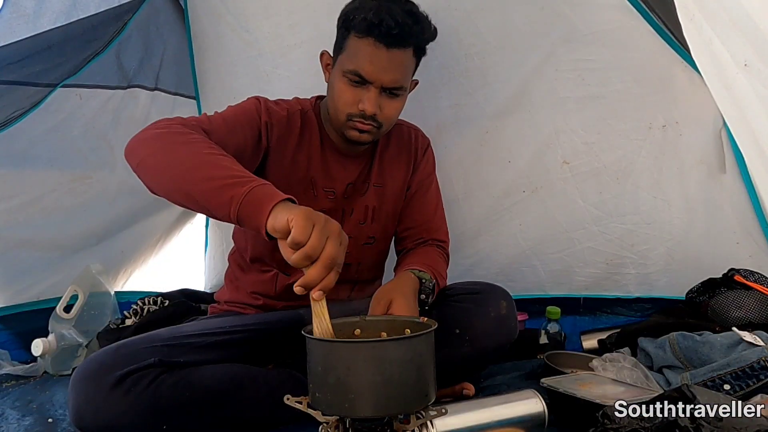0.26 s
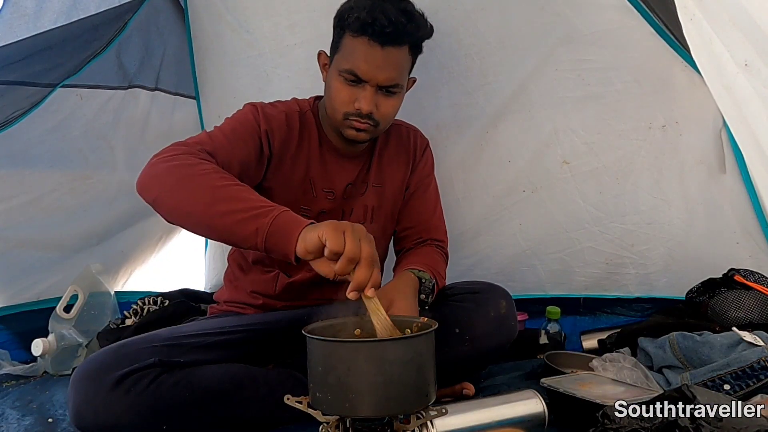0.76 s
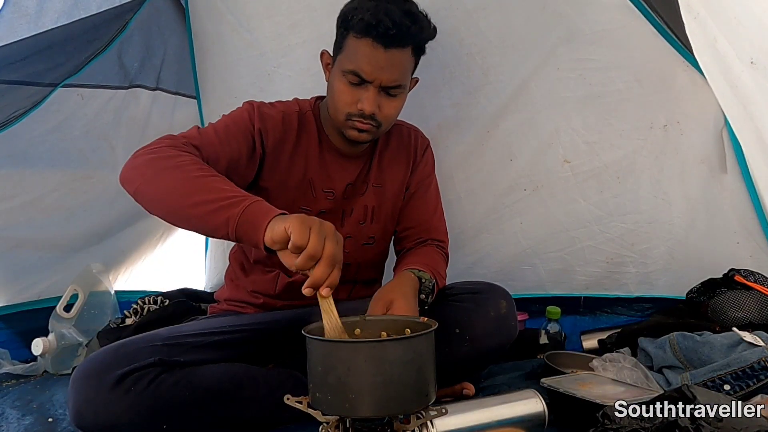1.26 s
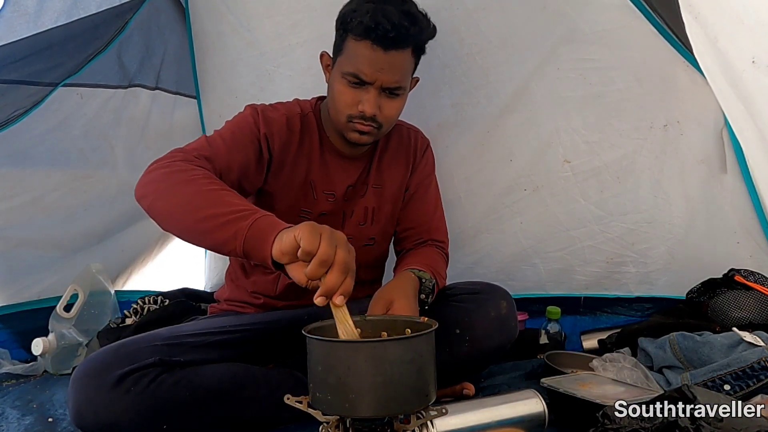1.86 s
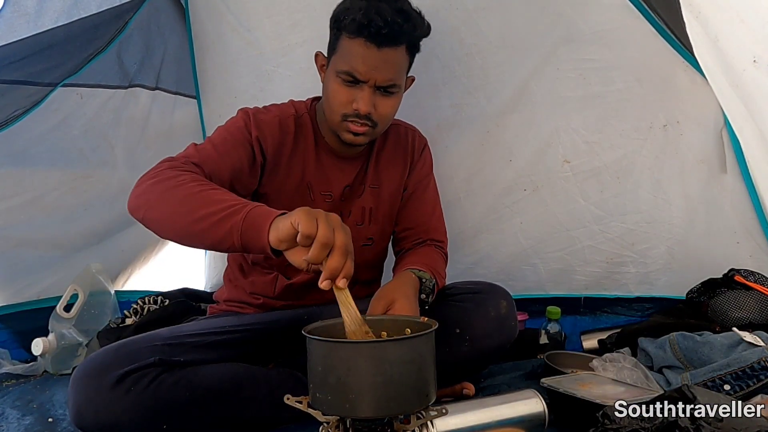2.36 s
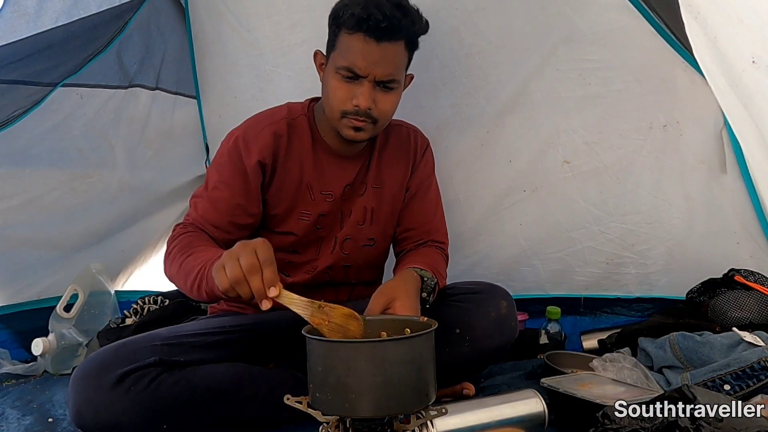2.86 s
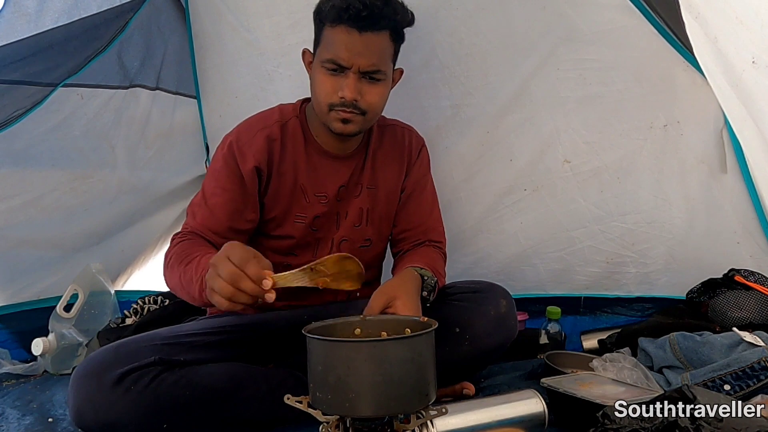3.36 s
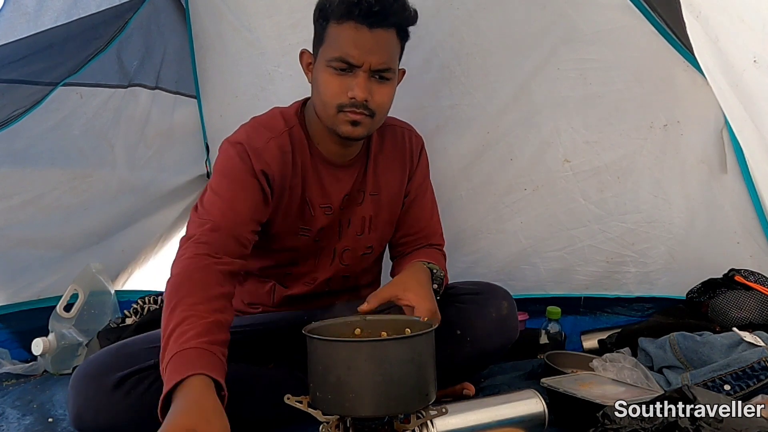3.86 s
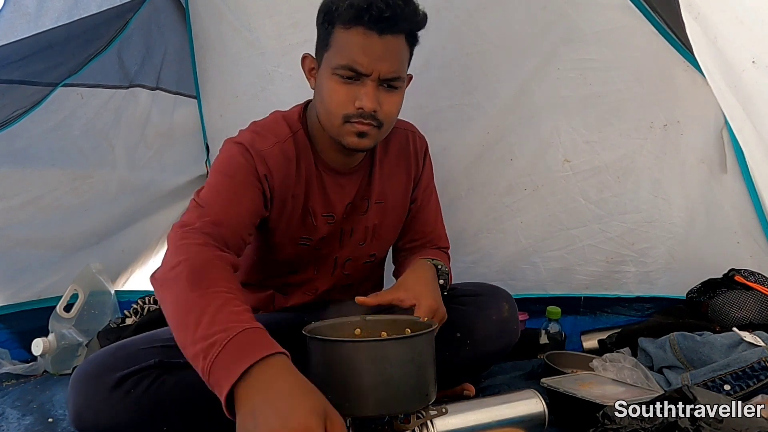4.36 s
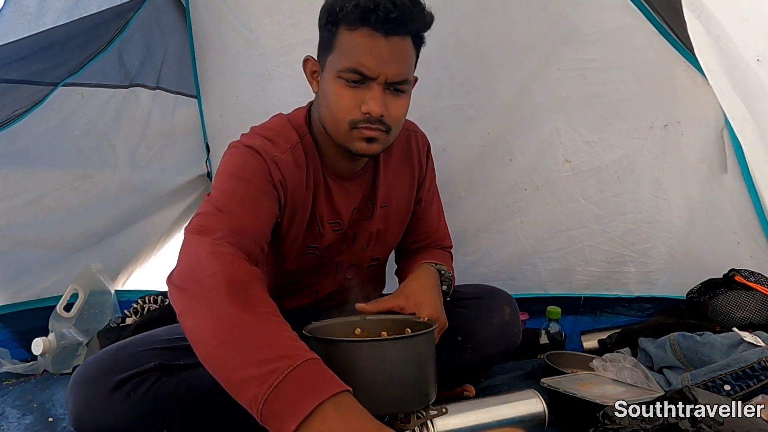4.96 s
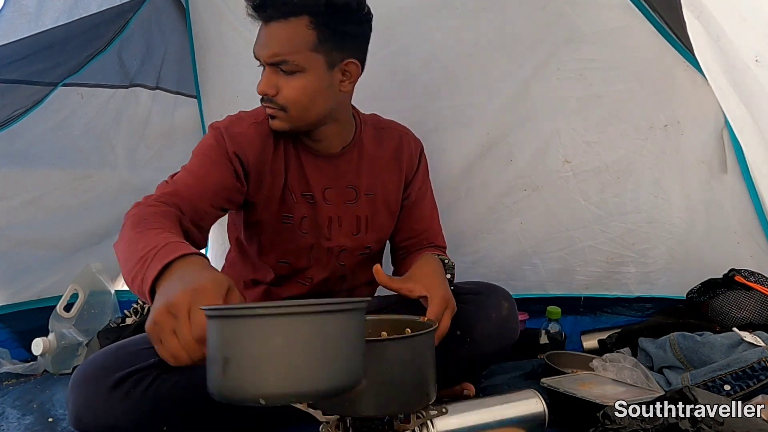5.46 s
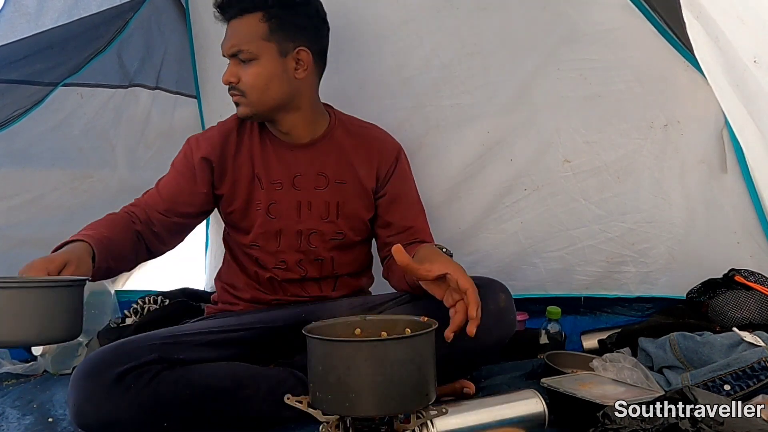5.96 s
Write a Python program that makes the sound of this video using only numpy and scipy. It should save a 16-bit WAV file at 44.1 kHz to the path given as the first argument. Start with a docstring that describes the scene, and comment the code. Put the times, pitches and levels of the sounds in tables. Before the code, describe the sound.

A small gas burner hisses in a tent as a full pot ticks, a wooden spoon taps its rim and an empty metal pot clanks twice.

```python
"""A small gas burner hisses throughout under a pot of food in a tent, over a low flame rumble and a faint hum.
All these are shaped noise. The full pot ticks and rattles on its stand: contacts that ring damped modes.
A wooden spoon thumps the pot's floor, then taps the rim four times: decaying sines and bursts of noise.
A hand then knocks an empty metal pot twice, on the wall and on the rim, and damps its ringing modes.
Last, the pot is scraped over cloth at the left: grainy noise in strokes."""
import sys
import numpy as np
from scipy import signal
from scipy.fft import rfft, irfft, next_fast_len
from scipy.io import wavfile
from scipy.ndimage import uniform_filter1d, map_coordinates

SR = 44100
rng = np.random.default_rng(int(sys.argv[2]) if len(sys.argv) > 2 else 0)


def to_linear_factor(level_db):
    """Convert decibel levels (scalar or array-like) to linear amplitude factors."""
    exponent = np.asarray(level_db, float) / 20
    return 10 ** exponent


def unload_wav(signal):
    """Save mono or channel-first audio to the path in sys.argv[1] as 16-bit WAV at rate SR, clipped to [-1, 1]."""
    wavfile.write(
        sys.argv[1],
        SR,
        np.round(np.clip(np.atleast_2d(signal).T, -1, 1) * 32767).astype(np.int16),
    )


N = 274743

# how busy the full pot is, before wavering: time_s, rattle_db, simmer_db
BUSY = [(0, -56, -48), (0.1, -53, -56), (0.5, -53.5, -57), (0.73, -54, -57.5), (1.1, -57, -64),
        (1.45, -58.5, -67), (1.65, -62, -75), (2.0, -72, -77), (2.3, -58, -63), (2.65, -63, -66),
        (3.2, -55, -59), (3.7, -56, -66), (4.1, -54.5, -59), (4.5, -54, -63), (4.95, -49.5, -55),
        (5.25, -53, -62), (5.7, -51, -58), (6.23, -51, -59)]


def unit(x):
    """Normalization: scales a signal to rms 1."""
    return x / np.sqrt(np.mean(x ** 2) + 1e-20)


def along(points, hz):
    """Interpolation on a logarithmic frequency axis, through points of (Hz, value)."""
    f, v = np.transpose(points)
    return np.interp(np.log(hz + 1), np.log(f + 1), v)


def curves(rows):
    """Linear interpolation in time: one value per sample for each column after the time in s."""
    s, *columns = np.transpose(rows)
    return [np.interp(np.arange(N) / SR, s, column) for column in columns]


def wobble(rate):
    """Slow random modulation: a smooth curve through random knots, rate of them a second."""
    return map_coordinates(rng.standard_normal(N // 256), [np.arange(N) * rate / SR])


def filtered(x, response):
    """Linear filtering: multiplies the spectrum by a complex response of frequency."""
    m = next_fast_len(N + SR // 2)
    spectrum = rfft(x, m) * response(np.fft.rfftfreq(m, 1 / SR))
    return irfft(spectrum, m)[..., :N]


def peaks(rows):
    """Incoherent superposition: noise gain of resonances (Hz, width Hz, dB) whose powers add."""
    def gain(f):
        power = sum(to_linear_factor(2 * db) / (1 + (2 * (f - hz) / width) ** 2) ** 2 for hz, width, db in rows)
        return np.sqrt(power)
    return gain


def rush(gain):
    """Partial coherence: stereo noise of rms 1 whose two sides share a part set by frequency."""
    # likeness of left and right: pitch_hz, correlation (-1 to 1)
    alike = [(50, .95), (300, .82), (700, .85), (1100, .92), (1700, .7), (2300, .7), (2700, .92),
             (3200, .57), (5000, .47), (5900, .57), (6450, .85), (6950, .36), (7800, .7), (9200, .8),
             (10700, .62), (12200, .08), (14000, .35)]

    def mid_side_gain(hz):
        angle = np.arccos(np.clip(along(alike, hz), -1, 1)) / 2
        return gain(hz) * [np.cos(angle), np.sin(angle)]

    mid, side = filtered(rng.standard_normal((2, N)), mid_side_gain)
    return unit(np.array([mid + side, mid - side]))


def patchy(pair, depth_db):
    """Time-frequency modulation: random patches of gain, alike on both sides; rms 1."""
    z = signal.stft(pair, nperseg=512)[2]
    field = rng.standard_normal(z.shape[1:])
    field = uniform_filter1d(field, size=8, axis=0)  # some hundred Hz wide
    field = uniform_filter1d(field, size=14, axis=1)  # about a tenth of a second long
    return unit(signal.istft(z * to_linear_factor(depth_db * unit(field)), nperseg=512)[1][:, :N])


def add(track, s, sound):
    """Superposition: mixes a sound in at time s."""
    start = round(s * SR)
    track[start:start + len(sound)] += sound


def strike(modes, favoured_hz, reach, contact, scatter_db):
    """Modal synthesis: a rough contact rings damped modes, strongest near the favoured pitch; peak 1."""
    t = np.arange(SR // 3) / SR
    hz, db, t60 = np.transpose(modes)[:, :, None]
    octaves_away = np.abs(np.log2(hz / favoured_hz))
    level = db + scatter_db * rng.standard_normal(hz.shape) - reach * octaves_away
    signs = (-1) ** np.arange(len(hz))[:, None]  # neighbouring modes start in opposite directions
    ring = np.sum(signs * to_linear_factor(level - 60 * t / t60) * np.sin(2 * np.pi * hz * t), axis=0)
    ring = ring * (1 - np.exp(-t / 0.00051))
    push = rng.standard_normal(1024) * np.exp(-t[:1024] / contact)
    push[0] += 1.5 * np.linalg.norm(push)  # first impact ahead of the rough remainder
    sound = signal.fftconvolve(ring, push)[:len(t)]
    return sound / np.max(np.abs(sound))


def crack(gain, t60, rise):
    """Transient noise: a coloured burst with exponential rise and decay; peak 1."""
    t = np.arange(SR // 6) / SR
    spectrum = rfft(rng.standard_normal(len(t))) * gain(np.fft.rfftfreq(len(t), 1 / SR) + 1)
    sound = irfft(spectrum, len(t)) * to_linear_factor(-60 * t / t60) * (1 - np.exp(-t / rise))
    return sound / np.max(np.abs(sound))


def blows(table, modes, noise, reach, rise, tilt_db):
    """Impact excitation: each blow rings the modes and adds the noise of the rough contact."""
    hard_db, hard_s = -10, .0007  # a blow of this ring peak has this contact time constant
    longer_s_per_db, soft_s = .0008, .006  # softer blows last longer, up to soft_s
    track = np.zeros(N + SR)
    for s, db, hz, noise_db, t60 in table:
        contact = np.clip(hard_s + longer_s_per_db * (hard_db - db), hard_s, soft_s)
        add(track, s, to_linear_factor(db) * strike(modes, hz, reach, contact, scatter_db=1.5))
        colour = lambda f: to_linear_factor(along(noise, f) + tilt_db * np.log2(f))  # tilt in dB per octave
        add(track, s, to_linear_factor(noise_db) * crack(colour, t60, rise))
    return track[:N]


def tent(x):
    """Early reflection: nearby things answer briefly, unlike on each side and redrawn for each short stretch."""
    t, hop, wet = np.arange(2048) / SR, 4096, np.zeros((2, N + SR))
    for start in range(0, N, hop):
        tail = rng.standard_normal((2, len(t))) * to_linear_factor(-60 * t / 0.072) * (t > .0005)
        echo = signal.fftconvolve(x[None, start:start + hop], tail / np.linalg.norm(tail[0]), axes=1)
        wet[:, start:start + echo.shape[1]] += echo
    treble_rise = lambda hz: np.sqrt(0.08 + hz ** 2 / (hz ** 2 + 2500 ** 2))
    return filtered(wet[:, :N], treble_rise)


def hum():
    """Narrow-band noise: low resonant bands waver by random beating."""
    # hum bands: pitch_hz, width_hz, relative_db
    bands = [(25, 21, -18), (44.9, 13, -1.5), (92, 11, -9.5)]
    return to_linear_factor(-56.0) * rush(peaks(bands))


def flame_and_simmer():
    """Resonant filtering of turbulence: the flame rumbles and the food simmers, sharing one flutter."""
    # flame rumble resonances: pitch_hz, width_hz, relative_db
    flame_bands = [(72, 36, -1.5), (130, 120, -8), (180, 110, 1.5), (317, 240, -6.5)]
    simmer_bands = [(336, 230, -1.1), (600, 1200, -0.91)]  # the same columns
    rumble_db, rumble_follows = -53.5, .2  # middle level; dB per dB of simmer
    simmer_db = curves(BUSY)[1]
    flutter = wobble(7.2)
    flame_db = rumble_db + rumble_follows * (simmer_db - simmer_db.mean()) + 1.36 * flutter
    flame = to_linear_factor(flame_db) * rush(peaks(flame_bands))
    simmer = to_linear_factor(simmer_db + 2.7 * flutter + 1.7 * wobble(30)) * rush(peaks(simmer_bands))
    return flame + simmer


def gas_jet():
    """Jet turbulence: escaping gas makes broad hiss, and the jet's resonances favour two bands."""
    # gas flow rising and falling, before trims and wavering: time_s, hiss_db, low_jet_db
    gas = [(0, -54.5, -54.5), (0.7, -52, -53.5), (2.0, -51, -53.5), (2.4, -49.5, -51), (2.7, -50, -53),
           (3.7, -50, -53), (4.0, -48.5, -52), (4.3, -49.5, -55.5), (4.7, -51, -54.5), (5.0, -47.5, -54),
           (5.3, -50, -53), (5.66, -48, -55.5), (6.23, -48, -52)]
    # jet resonances, high band: pitch_hz, width_hz, relative_db
    jet_high = [(6040, 50, -15), (6160, 45, -8), (6260, 60, -9), (6490, 52, -11), (6390, 150, -3.5),
                (6540, 94, -2), (6647, 150, -6), (6830, 70, -8), (6990, 160, -11)]
    # jet resonances, low band: pitch_hz, width_hz, relative_db
    jet_low = [(2690, 160, 1), (2846, 190, -3.5)]
    # colour of the broad hiss: pitch_hz, relative_db
    hiss_colour = [(250, -120), (400, -10), (750, -7), (1200, 5.5), (2300, 1), (3300, -1), (4500, -1),
                   (5200, -2.5), (6500, -5.5), (7500, -6.5), (9700, -7), (11000, -14.5), (12200, -13.5),
                   (13000, -22), (14300, -24), (15500, -120)]
    # weak fixed resonances of the tent that streak the hiss: pitch_hz, width_hz, boost_db
    streak_rows = [(1460, 70, 4), (1860, 60, 5), (4300, 90, 4), (4550, 80, 4), (5340, 90, 5), (5700, 50, 5),
                   (7850, 80, 4), (8880, 60, 5), (9300, 70, 3), (9710, 180, 4), (11450, 80, 5),
                   (12000, 70, 6)]
    hiss_db, low_db = curves(gas)
    breathe = 0.89 * wobble(14)
    jet = to_linear_factor(hiss_db - 1.0 + breathe) * rush(peaks(jet_high))
    jet = jet + to_linear_factor(low_db + breathe) * rush(peaks(jet_low))
    streaks = lambda f: sum(db / (1 + (2 * (f - hz) / width) ** 2) for hz, width, db in streak_rows)
    noise = rush(lambda hz: to_linear_factor(along(hiss_colour, hz) + streaks(hz)))
    waver_db = 0.57 * wobble(6.65) + .4 * wobble(25)
    return jet + to_linear_factor(hiss_db - 1.5 + waver_db) * patchy(noise, depth_db=1.5)


def pot():
    """Modal response: clear ticks, faint chance ticks and a dense rattle of soft contacts ring the full pot."""
    # modes of the full pot on its stand: pitch_hz, relative_db, t60_s
    pot_modes = [(420, -9, .04), (600, -9, .04), (760, -8, .03), (870, -2, .045), (945, -1, .04),
                 (1090, -1, .045), (1220, -2, .045), (1330, -7, .035), (1520, -7, .035), (1700, -11, .03),
                 (1865, -1, .055), (2050, -5, .035), (2250, -8, .03)]
    # clear ticks: start_s, peak_db, favoured_hz
    ticks = [(0.071, -35, 1050), (0.179, -33, 853), (0.284, -32, 870), (0.317, -36, 853), (0.347, -38, 907),
             (0.412, -35, 872), (0.466, -37, 850), (0.603, -36, 1220), (0.82, -30.5, 1900),
             (0.924, -34.5, 1090), (1.014, -35.5, 1100), (1.22, -38, 875), (1.569, -35, 1890),
             (2.427, -38, 1210), (2.524, -35.5, 930), (2.892, -35, 1230), (3.523, -32.5, 1970),
             (3.579, -33, 1900), (4.14, -37, 1710), (4.218, -33, 1340), (4.385, -34, 1240),
             (4.595, -36.5, 1250), (4.79, -33, 1920), (4.832, -32.5, 1820), (4.909, -37, 1870),
             (5.25, -31.5, 1250), (5.365, -33, 1250), (5.449, -32.5, 1870), (5.503, -34, 1150),
             (5.57, -34, 1900), (5.62, -35, 939), (5.667, -34, 1130), (5.688, -33, 980), (5.749, -34, 1020),
             (5.843, -35, 1850), (5.852, -34.5, 1240), (5.946, -27.5, 1080), (6.084, -31.5, 1100),
             (6.115, -35.5, 1100), (6.185, -32.5, 1090)]
    faint_count, faint_db, faint_range_db = 45, -40, 9  # loudest peak, range below it
    low_hz, high_hz = 850, 1900  # favoured pitch of faint ticks
    track, busy = np.zeros(N + SR), to_linear_factor(curves(BUSY)[0])
    when, size, place = rng.random((faint_count, 3)).T
    # faint ticks are likelier when the pot is busy
    faint_s = np.interp(when, np.cumsum(busy) / busy.sum(), np.arange(N) / SR)
    faint_hz = low_hz * (high_hz / low_hz) ** (place ** 4)
    faint = zip(faint_s, faint_db - faint_range_db * size, faint_hz)
    for s, db, hz in [*ticks, *faint]:
        add(track, s, to_linear_factor(db) * strike(pot_modes, hz, reach=6., contact=.004, scatter_db=4))
    # sparse random contacts whose strength wavers
    contacts = to_linear_factor(np.clip(5.4 * wobble(70), -30, 8)) * rng.standard_normal(N) * (rng.random(N) < .02)

    def soft_ring(f):
        ring = sum((-1) ** k * to_linear_factor(db) * f / (hz * hz - f * f + 2.2j * f / t60)
                   for k, (hz, db, t60) in enumerate(pot_modes))
        return ring / (1 + (f / 2400) ** 6)  # soft contacts excite little treble

    return track[:N] + busy * unit(filtered(contacts, soft_ring))


def thumps_and_clicks():
    """Damped oscillation and transient noise: low pushes of the spoon and short dry clicks."""
    # soft thumps on the pot's floor: start_s, level_db (before rise and decay), pitch_hz, t60_s
    thumps = [(0.636, -22, 199, 0.077), (0.638, -30.5, 328, 0.063), (1.03, -34.5, 180, 0.099),
              (1.108, -31.5, 217, 0.029), (2.138, -35.5, 199, 0.035), (3.049, -43.5, 92, 0.34),
              (4.808, -39, 204, 0.062), (6.2, -34, 252, 0.076)]
    # dry clicks and scuffs: start_s, peak_db, pitch_hz, width_hz (standard deviation), t60_s
    clicks = [(0.635, -25.5, 1120, 600, 0.022), (0.64, -32, 1300, 1000, .2), (0.649, -33, 2500, 397, .2),
              (.665, -40, 800, 400, 0.089), (.683, -36, 1013, 600, 0.09), (1.206, -33, 7900, 1000, .04),
              (1.966, -45, 3460, 900, 0.034), (2.15, -39, 7000, 2500, .04), (2.525, -42, 3000, 1500, .02),
              (3.146, -41, 1500, 900, 0.13), (4.022, -34, 1900, 300, 0.045), (4.19, -39, 8900, 1200, .12),
              (4.8455, -24.5, 2700, 600, .012), (4.849, -30, 2280, 1200, 0.063),
              (4.937, -46, 4000, 1200, .04), (5.143, -31.5, 5950, 200, 0.033),
              (5.384, -35, 7450, 1200, .06)]
    track, t = np.zeros(N + SR), np.arange(SR // 3) / SR
    for s, db, hz, t60 in thumps:
        envelope = to_linear_factor(db - 60 * t / t60) * (1 - np.exp(-t / .0015))
        add(track, s, envelope * np.sin(2 * np.pi * hz * t))
    for s, db, hz, width, t60 in clicks:
        band = lambda f: np.exp(-((f - hz) / width) ** 2 / 2)
        add(track, s, to_linear_factor(db) * crack(band, t60, rise=0.0015))
    return track[:N]


def spoon_taps():
    """Impact excitation: wood on the metal rim rings short modes with a rough burst."""
    # modes of the wooden spoon: pitch_hz, relative_db, t60_s
    spoon_modes = [(238, -5, .08), (450, -4, .045), (665, -5, .04), (830, -6, .04), (975, -6, .045),
                   (1120, -4, .04), (1290, 1, .04), (1400, -5, .035), (1665, -5, .045), (1860, -4, .045),
                   (2205, -7, .04), (2480, -9, .05), (2670, -9, .04), (2905, -8, .05), (3370, -13, .05),
                   (3790, -20, .04)]
    # taps on the rim: start_s, ring_peak_db, favoured_hz, noise_peak_db, noise_t60_s
    taps = [(3.0245, -13, 1200, -23, 0.06), (3.162, -16.5, 1150, -26, 0.08),
            (3.298, -15.5, 1150, -23, 0.074), (3.419, -20, 690, -26.5, 0.083)]
    # colour of rough wood on metal, before the tilt: pitch_hz, relative_db
    tap_noise = [(250, -40), (500, -7.5), (2500, -13.5), (3300, -15), (4700, -14.5), (5400, -9), (7900, -8),
                 (10000, -15), (14000, -46)]
    return blows(taps, spoon_modes, tap_noise, reach=4.5, rise=.005, tilt_db=-1.9)


def scrape():
    """Friction noise: the pot dragged over cloth gives grainy rubbing in strokes, toward the left."""
    # colour of the cloth: pitch_hz, relative_db
    cloth = [(180, -24), (300, -6), (675, -18), (1050, -6), (2200, -10), (3150, -6), (3480, -10),
             (3900, -1), (5300, -3), (6550, -7), (10000, -13), (14500, -33)]
    # strokes, before graininess and panning: peak_s, peak_db, length_s (to swell or fade by stroke_db)
    stroke_rows = [(4.84, -51, .06), (5.06, -55, .2), (5.38, -59, .12), (5.7, -64, .5), (6.15, -57, .15),
                   (6.23, -30.5, .075)]
    stroke_db, t = 25, np.arange(N) / SR
    strokes = sum(to_linear_factor(db - stroke_db * np.abs(t - s) / length) for s, db, length in stroke_rows)
    rub = strokes * to_linear_factor(2.1 * wobble(78)) * rush(lambda hz: to_linear_factor(along(cloth, hz)))
    return rub * to_linear_factor([[1.2], [-1.2]])


def empty_pot():
    """Modal excitation and damping: knocked on the wall, then on the rim; the hand damps each clank."""
    # modes of the empty pot: pitch_hz, wall_db, rim_db (relative, by place struck), t60_s
    modes = np.array([(200, -30, -9, .08), (275, -26, -12, .06), (403, -9, -10, .12), (465, -11, -18, .08),
                      (530, -22, -9, .12), (595, -20, 0, .09), (665, -8, -8, .09), (869, -8, -15, .1),
                      (934, -15, -4, .12), (1001, 0, -10, .08), (1083, 0, -7, .08), (1211, -10, -4, .15),
                      (1263, -8, -15, .09), (1515, -10, -12, .1), (1700, -14, -14, .1),
                      (1982, -10, -14, .1), (2090, -15, -5, .14), (2590, -10, -12, .1),
                      (2654, -12, -9, .14), (2986, -10, -16, .1), (3061, -16, -6, .13),
                      (3485, -16, -11, .1), (3885, -13, -16, .1), (4001, -16, -12, .14),
                      (4704, -14, -4, .1), (5120, -18, -10, .11), (5330, -20, -16, .14),
                      (5717, -20, -14, .12), (7180, -22, -16, .14), (7870, -20, -18, .14)])
    # contacts before the hand damps them, three on the wall, then those on the rim:
    # start_s, ring_peak_db, favoured_hz, noise_peak_db, noise_t60_s
    clanks = [(4.039, -9.5, 1130, -17, 0.06), (4.05, -30, 1100, -20.5, .15),
              (4.064, -35, 800, -19.5, 0.075), (4.2672, -40, 7000, -26, .09), (4.27, -9.5, 2610, -17, 0.16),
              (4.2775, -17, 800, -11.5, 0.095), (4.289, -26, 1200, -15, 0.15), (4.31, -23, 5000, -18, 0.22),
              (4.322, -25, 900, -23, 0.11)]
    # colour of the rough contact, before the tilt: pitch_hz, relative_db
    clank_noise = [(150, -60), (330, -25), (400, 8), (800, -7.5), (1000, 6.5), (1800, -10), (2400, -5.5),
                   (4700, -12.5), (7400, -13), (8600, -13), (10000, -22), (15000, -42)]
    grab_s, close_s, grab_db = 4.078, .018, -19  # the hand closes on the first clank: start, duration, gain
    rest_db_per_s, rest_s = -145, .07  # the hand rests on the rim through the second: rate, duration
    t = np.arange(N) / SR
    wall = blows(clanks[:3], modes[:, [0, 1, 3]], clank_noise, reach=2.5, rise=.0004, tilt_db=5.5)
    rim = blows(clanks[3:], modes[:, [0, 2, 3]], clank_noise, reach=1.01, rise=.0008, tilt_db=3.5)
    grab = to_linear_factor(grab_db * np.clip((t - grab_s) / close_s, 0, 1))
    rest = to_linear_factor(rest_db_per_s * np.clip(t - clanks[3][0], 0, rest_s))
    return wall * grab + rim * rest


def scene():
    """Superposition: all sources in the tent, the hits with their brief reflections."""
    hits = pot() + thumps_and_clicks() + spoon_taps() + empty_pot()
    hits = filtered(hits, lambda hz: 1 / (1 + 1j * hz / 11000) ** 3)  # sharp edges arrive dulled
    background = hum() + flame_and_simmer() + gas_jet()
    return background + hits + to_linear_factor(-5.5) * tent(hits) + scrape()


def top_cut(x):
    """Nothing passes above the cut-off."""
    return signal.sosfilt(signal.butter(12, 15660, fs=SR, output="sos"), x)


def record(dry):
    """Interchannel level and phase difference: two microphone ports differ, under a steep band limit."""
    # level between the ports: pitch_hz, left_over_right_db
    sides = [(100, -0.2), (350, -0.9), (700, -1.4), (1100, 1.1), (1700, -0.5), (2700, 2.5), (3300, 0.5),
             (5000, 0.2), (5900, -2.5), (6450, 2), (6950, -5), (7800, -0.5), (10700, 0.5), (12200, 9),
             (14000, -4)]
    # phase between the ports: pitch_hz, left_lead_rad
    lead = [(60, -.05), (300, -.25), (700, -.08), (1100, -.35), (1700, -.2), (2200, -.7), (3200, -.8),
            (4000, -.5), (6400, -.55), (7000, -.1), (14000, 0)]
    side = np.array([[1], [-1]])

    def ports(hz):
        colour = to_linear_factor(side * along(sides, hz) / 2)
        phase = np.exp(.5j * side * along(lead, hz))
        return colour * phase / (1 + (hz / 14900) ** 40)

    return top_cut(filtered(dry, ports))


dry = scene()
out = record(dry)
unload_wav(out)
```